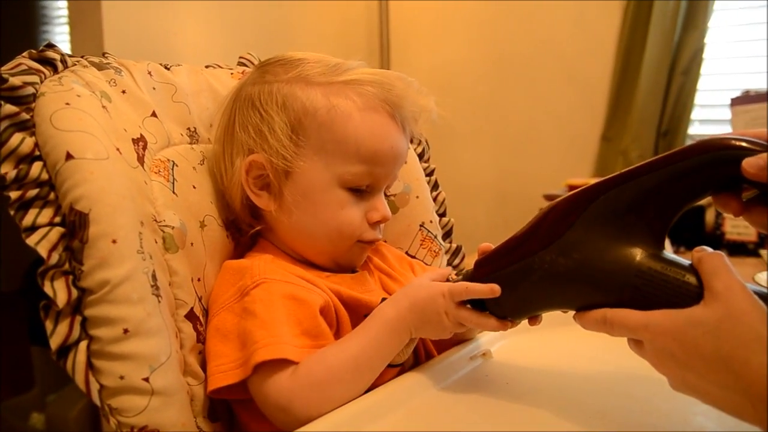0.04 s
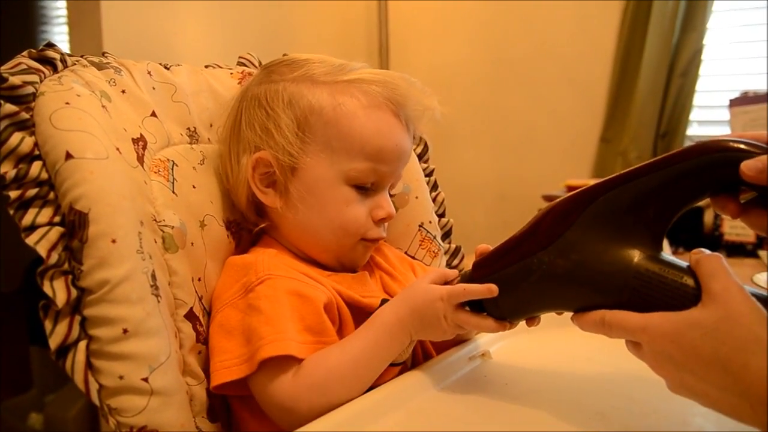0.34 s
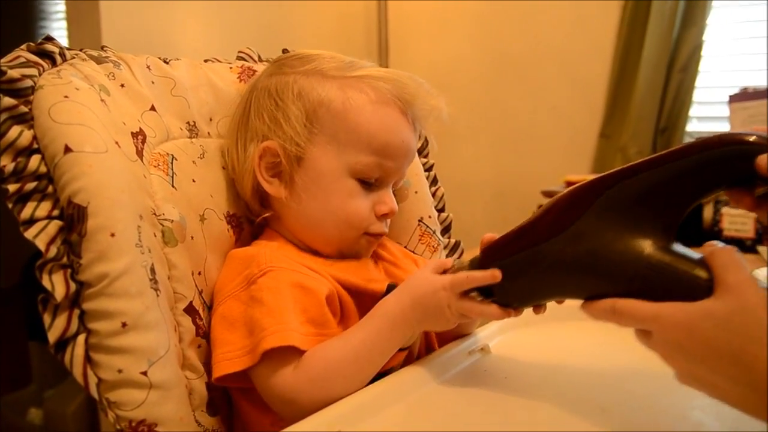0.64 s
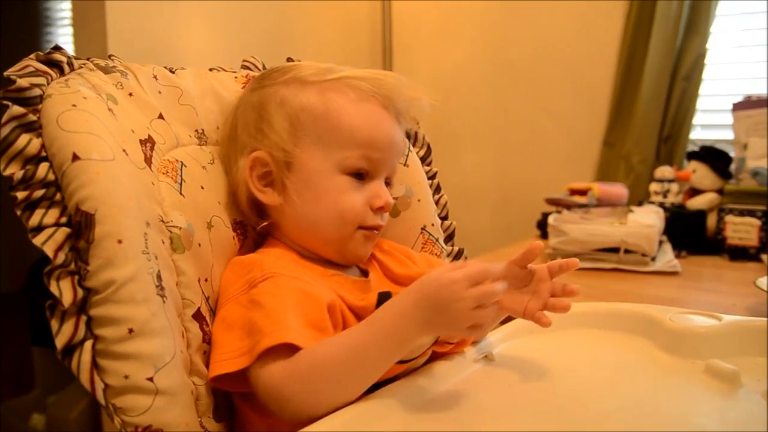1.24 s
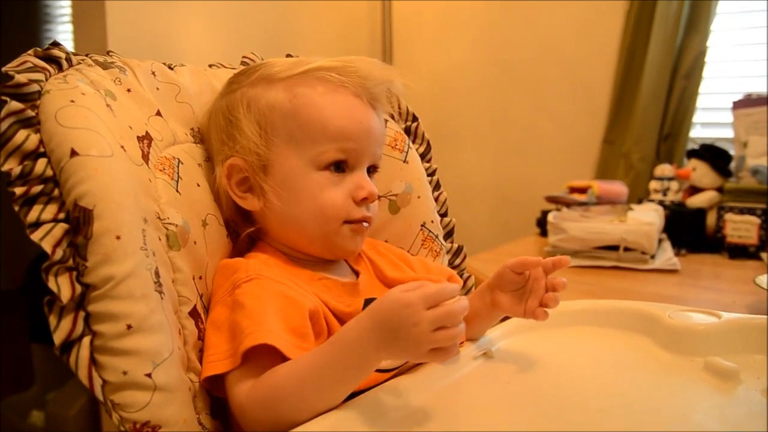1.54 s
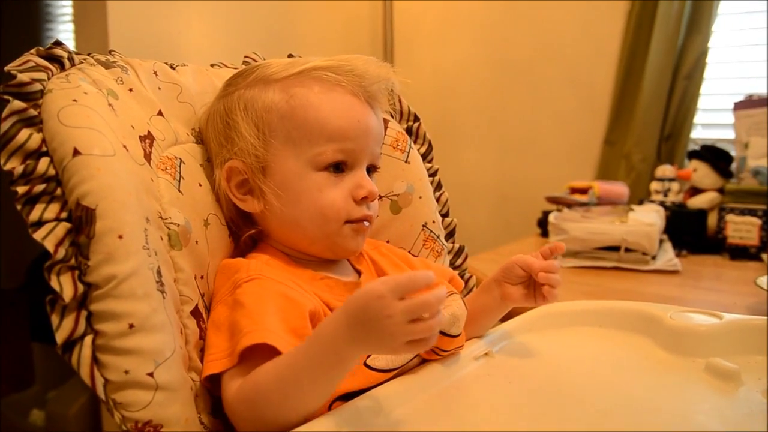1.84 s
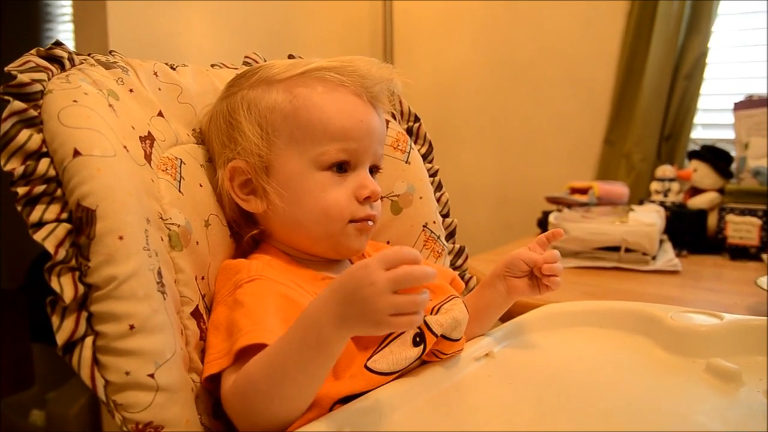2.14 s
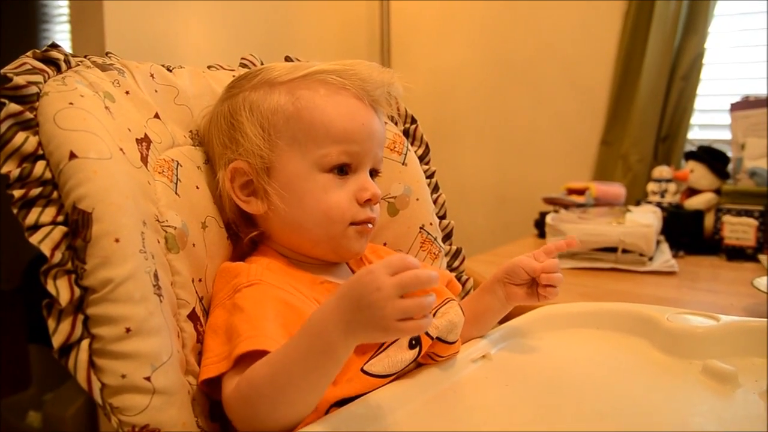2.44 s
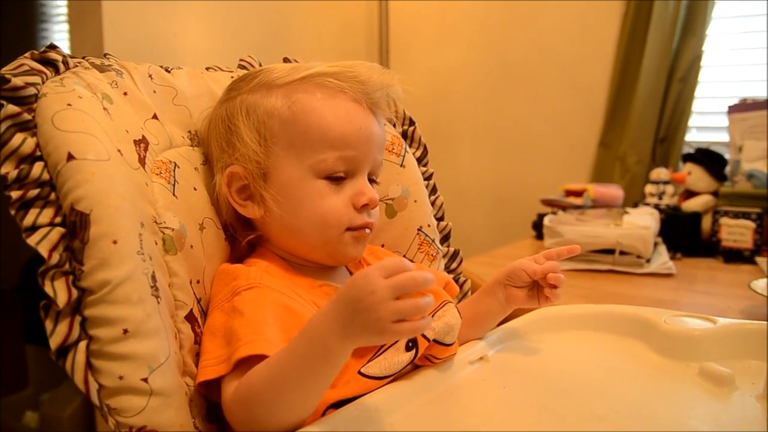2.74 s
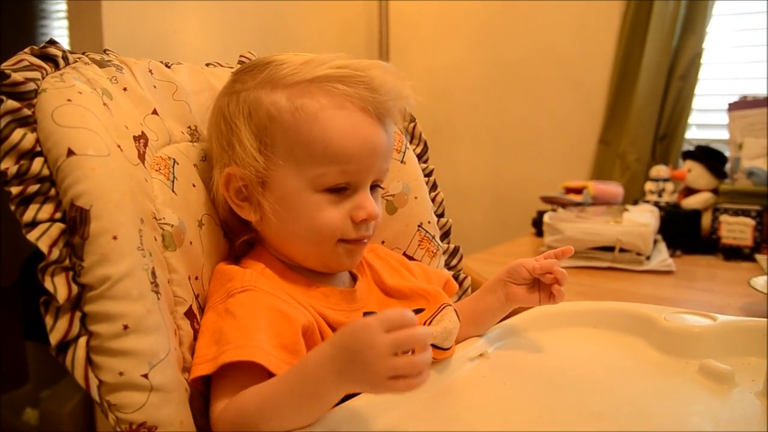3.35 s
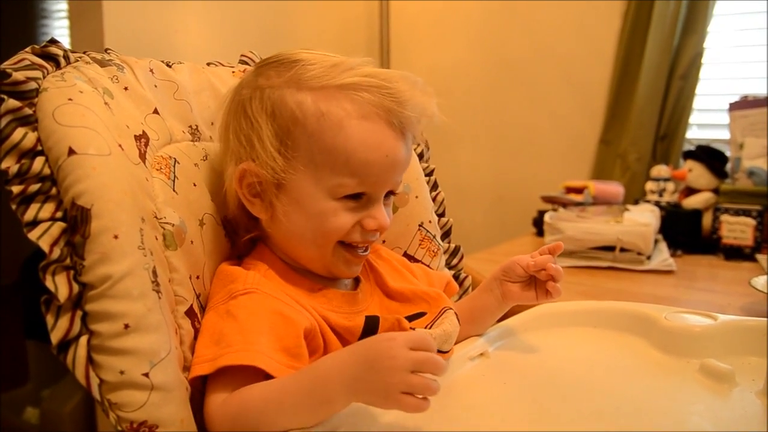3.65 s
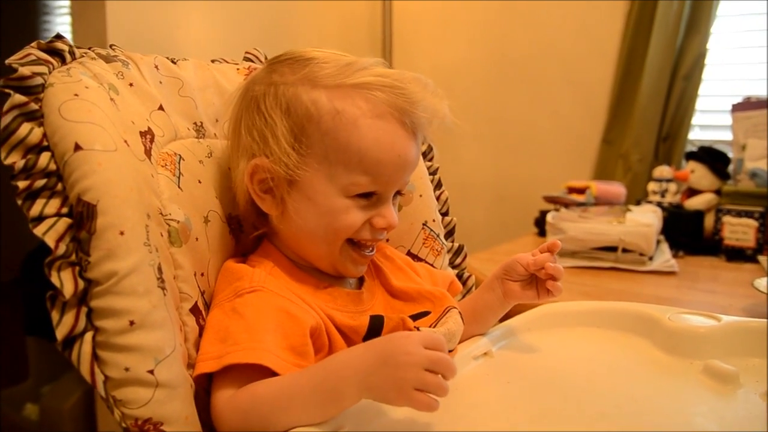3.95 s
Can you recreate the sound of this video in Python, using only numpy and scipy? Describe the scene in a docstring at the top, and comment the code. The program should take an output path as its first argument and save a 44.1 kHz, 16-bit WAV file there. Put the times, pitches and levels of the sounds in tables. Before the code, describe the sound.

Vacuum cleaner running indoors, its covered nozzle pulling free and roaring as it moves away.

```python
"""A vacuum cleaner runs in a room: a steady rush and a motor tone, with the nozzle close by.
At first a small hand half covers the nozzle and air hisses through the gap. At 0.9 s it pulls free:
the mouth resonance falls, the sound opens into a roar and the tone sags a little as air flows freely.
From 2.4 s the nozzle moves away and gets duller. Near 3.1 s it is briefly choked, then roars again."""
import sys
import numpy as np
from scipy import signal
from scipy.fft import rfft, irfft, next_fast_len
from scipy.io import wavfile
from scipy.ndimage import map_coordinates

SR = 44100
rng = np.random.default_rng(int(sys.argv[2]) if len(sys.argv) > 2 else 0)


def pcm_store(signal):
    """Save signal as 16-bit PCM."""
    levels = np.round(np.clip(np.atleast_2d(signal), -1, 1) * 32767)
    wavfile.write(sys.argv[1], SR, levels.astype(np.int16).T)


N = 176400
T = np.arange(N) / SR

# Stereo likeness of air noise, nozzle away and close. Each row: frequency in Hz, left-right correlation.
LIKENESS_AWAY = [(100, .97), (500, 0.93), (1200, 0.7), (2400, 0.57), (4000, 0.63), (7500, 0.74),
                 (10200, 0.19), (12500, 1)]
LIKENESS_CLOSE = [(100, 0.93), (1200, 1), (2200, 1), (5000, 0.97), (8000, 1), (10200, 0.33), (12500, 0.94)]


def amp(db):
    return 10 ** (np.asarray(db) / 20)


def pan(left_lead_db):
    """Left and right gains for a level difference."""
    return amp(np.array([[.5], [-.5]]) * left_lead_db)


def along(points, hz):
    """Rows of (Hz, value), interpolated on a log frequency axis."""
    point_hz, values = np.transpose(points)
    return np.interp(np.log(hz + 1), np.log(point_hz + 1), values)


def curves(rows, t=T):
    """Each column after the time, read at times t."""
    times_s, *columns = np.transpose(rows)
    return [np.interp(t, times_s, column) for column in columns]


def wobble(rate_hz):
    """Smooth random curve, rate_hz knots a second."""
    return map_coordinates(rng.standard_normal(int(N * rate_hz / SR) + 4), [T * rate_hz])


def filtered(x, response):
    """x filtered by the gain response(hz)."""
    size = next_fast_len(N + SR // 2)
    return irfft(rfft(x, size) * response(np.fft.rfftfreq(size, 1 / SR)), size)[..., :N]


def resonance(hz, centre_hz, width_hz):
    """Peak of unit mean power; width taken 6 dB down."""
    gain = 1 / (1 + ((hz - centre_hz) / (width_hz / 2)) ** 2)
    return gain / np.sqrt(np.mean(gain ** 2, axis=0))


def bells(bands, hz):
    """Gain of a set of bell-shaped lifts and dips."""
    return amp(sum(db / (1 + ((hz - centre_hz) / half_hz) ** 2) for centre_hz, half_hz, db in bands))


def turbulence(likeness):
    """White stereo noise with the given left-right correlation."""
    def mid_side_gains(hz):
        angle = np.arccos(np.clip(along(likeness, hz), -.99, .99)) / 2
        return np.array([np.cos(angle), np.sin(angle)])
    mid, side = filtered(rng.standard_normal((2, N)), mid_side_gains)
    return np.array([mid + side, mid - side])


def rush(spectrum, likeness, gain_db, flutter_db):
    """Coloured air noise whose level flutters."""
    air = filtered(turbulence(likeness), lambda hz: amp(along(spectrum, hz))) * np.sqrt(SR / 2)
    return air * amp(gain_db + flutter_db * wobble(rate_hz=45))


def room(x, t60_s=0.21, gain_db=-10.5):
    """Short diffuse reflections from the walls."""
    t = T[:SR // 3]
    tail = rng.standard_normal((2, len(t))) * amp(-60 * t / t60_s) * (t > .004)
    return amp(gain_db) * signal.fftconvolve(x, tail / np.linalg.norm(tail[0]), axes=1)[:, :N]


def duct(x):
    """Standing waves in the air path lift and dip narrow bands."""
    # Each row: centre in Hz, half width in Hz, gain in dB.
    standing_waves = [(175, 12, 3), (240, 10, 4), (280, 12, 3), (352, 15, 4), (432, 10, 4), (457, 9, 5),
                      (486, 16, -7), (618, 15, 3), (815, 35, -3), (967, 14, 4), (1044, 11, 6),
                      (1116, 12, 4), (1320, 12, 4), (1440, 25, -2), (1620, 18, 4), (1742, 12, 4),
                      (1824, 9, 4), (2005, 9, 3), (2195, 12, 4), (2500, 70, -2), (2560, 10, 5),
                      (3765, 12, 4), (4652, 14, 5)]
    return filtered(x, lambda hz: bells(standing_waves, hz))


def machine():
    """Steady rush of the cleaner's body."""
    # Each row: frequency in Hz, noise density in dB.
    spectrum = [(20, -98), (60, -112), (85, -100), (130, -86.5), (180, -74.5), (260, -65.5), (440, -58.5),
                (560, -59), (720, -65.5), (1000, -64), (1500, -67.5), (3000, -73.5), (5000, -75),
                (9000, -95.5), (15000, -103)]
    return rush(spectrum, LIKENESS_AWAY, gain_db=0, flutter_db=0.43)


def motor(drift_hz=0.14, waver_db=.5):
    """Slightly unsteady tone of the motor shaft."""
    # Each row: time in seconds, pitch in Hz.
    speed = [(0, 518.5), (.9, 518.6), (1.05, 517), (1.3, 514.5), (1.6, 511.8), (2.2, 510.7), (3.1, 510.8),
             (3.25, 517.2), (3.45, 513.5), (3.75, 512), (4, 511)]
    # Each row: time in seconds, level in dB.
    levels = [(0, -29.5), (.8, -30), (1.05, -28.5), (1.3, -24), (1.55, -24), (1.75, -22), (2.1, -22.5),
              (2.6, -22), (3.1, -22), (3.3, -28.5), (3.55, -24.5), (3.8, -22), (4, -23)]
    pitch_hz = curves(speed)[0] + drift_hz * wobble(rate_hz=16)
    tone = np.sqrt(2) * np.sin(2 * np.pi * np.cumsum(pitch_hz) / SR)
    return tone * amp(curves(levels)[0] + waver_db * wobble(rate_hz=12))


def puff(peak_s=1.02, half_length_s=0.028, level_db=-46):
    """Soft low thud of draught as the nozzle swings past the microphone."""
    air = filtered(rng.standard_normal(N), lambda hz: resonance(hz, centre_hz=50, width_hz=50))
    air /= np.sqrt(np.mean(air ** 2))
    return air * amp(level_db) * np.exp(-((T - peak_s) / half_length_s) ** 2)


def whistle(centre_hz=6183, width_hz=190, flutter_db=2.5):
    """Breathy narrow band of noise singing at the rim."""
    # Each row: time in seconds, level in dB.
    levels = [(0, -48), (.8, -51), (1, -37.5), (1.28, -45), (1.38, -33.5), (1.7, -38.5), (2.2, -39),
              (2.44, -39), (2.55, -52), (2.8, -49), (4, -52)]
    air = filtered(turbulence(LIKENESS_AWAY), lambda hz: resonance(hz, centre_hz, width_hz))
    return air * amp(curves(levels)[0] + flutter_db * wobble(rate_hz=24.85))


def gulps():
    """Air squeezing in as the nozzle closes or bursts open briefly rings the gap."""
    # Each row: peak time and half length in seconds, centre and width in Hz, level in dB.
    bursts = [(0.773, 0.076, 2530, 160, -27), (0.848, .04, 7300, 350, -38), (0.91, .025, 4740, 380, -27),
              (.905, 0.034, 7860, 350, -32), (.912, 0.0075, 2570, 300, -22), (.94, 0.026, 785, 190, -20),
              (0.942, 0.019, 580, 90, -18.5), (3.053, 0.015, 2890, 900, -26), (3.13, .07, 2900, 280, -35.5),
              (3.13, .07, 7450, 200, -41), (3.195, .02, 2900, 500, -25), (3.203, 0.02, 1580, 260, -23.5),
              (3.225, 0.037, 2450, 463, -26)]
    hz, t, noise = signal.stft(turbulence(LIKENESS_CLOSE), SR, nperseg=512)
    power = 0
    for peak_s, half_length_s, centre_hz, width_hz, level_db in bursts:
        envelope = amp(level_db) * np.exp(-((t - peak_s) / half_length_s) ** 2)
        power += (resonance(hz, centre_hz, width_hz)[:, None] * envelope) ** 2
    return signal.istft(noise * np.sqrt(power), SR)[1][:, :N]


def mouth(flutter_db=0.56):
    """Turbulence rings the nozzle's mouth; the resonance falls as it opens."""
    # Each row: time in seconds, centre in Hz, width in Hz, level in dB.
    glide = [(0, 4230, 1400, -24.5), (.5, 4360, 1400, -27), (.66, 3630, 1000, -20.5),
             (.77, 3550, 1000, -22.5), (.83, 2900, 1100, -27), (.895, 2600, 700, -23.5),
             (.908, 2540, 300, -11), (.94, 2500, 450, -22), (.965, 1840, 330, -15.5),
             (1.03, 1750, 190, -15.5), (1.12, 1720, 190, -19), (1.17, 2100, 480, -23.5),
             (1.5, 2140, 327, -20.5), (2.29, 2095, 400, -21.5), (2.39, 1730, 230, -25),
             (2.48, 1650, 200, -34), (2.62, 1640, 170, -30), (3, 1650, 150, -29.5), (3.13, 1570, 297, -53),
             (3.175, 1590, 400, -39), (3.21, 1530, 250, -20), (3.26, 1580, 250, -39), (3.6, 1620, 160, -31),
             (4, 1500, 150, -32.5)]
    hz, t, noise = signal.stft(turbulence(LIKENESS_CLOSE), SR, nperseg=512)
    centre_hz, width_hz, _ = curves(glide, t)
    air = signal.istft(noise * resonance(hz[:, None], centre_hz, width_hz), SR)[1][:, :N]
    return air * amp(curves(glide)[2] + flutter_db * wobble(rate_hz=68))


def rim_hiss():
    """Air hissing over the rim."""
    # Each row: frequency in Hz, noise density in dB.
    spectrum = [(1000, -102), (3000, -66.5), (5000, -69.5), (6400, -67), (7600, -70), (8600, -72.5),
                (10000, -78), (12000, -81), (15000, -103)]
    # Each row: time in seconds, gain in dB.
    gains = [(0, 0), (.6, 1), (.73, -6.5), (.82, 2), (.91, 8), (.97, -4), (1.1, -5.5), (1.5, -5),
             (2.25, -5), (2.42, -0.5), (2.55, -6.5), (2.95, -19), (3.03, -9), (3.09, -2.5), (3.16, 0),
             (3.2, 4), (3.27, -11.5), (3.7, -12), (3.8, -11), (4, -13)]
    return rush(spectrum, LIKENESS_AWAY, curves(gains)[0], flutter_db=0.74)


def covered_nozzle():
    """Air drawn past the hand, whose shadow shifts the stereo balance."""
    # Each row: frequency in Hz, noise density in dB.
    spectrum = [(150, -100), (350, -71), (680, -58.5), (850, -50.5), (1100, -51.5), (1350, -51.5),
                (1680, -63.5), (2000, -59), (2500, -67), (3400, -57.5), (5300, -60.5), (5900, -67),
                (6450, -64.5), (7100, -75), (7750, -69), (8300, -76), (9200, -71.5), (10500, -78),
                (15000, -91)]
    # Each row: time in seconds, gain in dB.
    gains = [(0, 0.5), (.3, 1.5), (.65, 0), (.78, -3), (.87, -1.5), (.95, -19), (1.05, -50)]
    # Each row: frequency in Hz, left minus right in dB.
    hand_shadow = [(1200, -0.5), (1900, 4.5), (3000, 2), (7000, -2), (9500, 0), (11200, 8), (13000, 1)]
    air = rush(spectrum, LIKENESS_CLOSE, curves(gains)[0], flutter_db=-1.04)
    return filtered(air, lambda hz: pan(along(hand_shadow, hz)))


def open_nozzle():
    """Air roaring into the open mouth, plus an upper rush while it is near."""
    # Each row: frequency in Hz, noise density in dB.
    roar_spectrum = [(150, -89), (350, -70), (600, -56.5), (830, -57), (1100, -58.5), (1400, -56.5),
                     (2200, -58), (2600, -62), (3400, -74), (5000, -79), (8000, -84), (15000, -102)]
    near_spectrum = [(600, -114), (1400, -66), (2300, -52), (2550, -78.5), (2850, -58.5), (3400, -63.5),
                     (4150, -61), (4800, -70), (7000, -78), (7900, -72), (9500, -110)]
    # Each row: time in seconds, gain in dB.
    roar_gains = [(0, -15), (.89, -8), (.91, 6), (.945, 4.5), (1, 6.5), (1.25, 4), (1.8, 3.5), (2.4, 3),
                  (2.6, 0), (3, 0.5), (3.06, -1), (3.1, -9), (3.17, -7.5), (3.22, 2), (3.3, 0), (3.7, 0.5),
                  (4, -1)]
    near_gains = [(.85, -30), (.91, 2.5), (1, 0), (1.5, -1.5), (2.2, -1.5), (2.4, 0.5), (2.6, -9.5),
                  (2.9, -18), (3.15, -19), (3.21, -5), (3.3, -11), (4, -24)]
    roar = rush(roar_spectrum, LIKENESS_AWAY, curves(roar_gains)[0], flutter_db=0.62)
    near = rush(near_spectrum, LIKENESS_AWAY, curves(near_gains)[0], flutter_db=1.14)
    return roar + near


def scene():
    """The moving nozzle's air in the room, over the machine's rush and tone."""
    # Nozzle position. Each row: time in seconds, left minus right in dB.
    swing = [(0, 0.4), (.9, 0), (1.2, -0.5), (2.2, -0.8), (2.6, -2), (3.2, -3), (4, -1)]
    air = covered_nozzle() + open_nozzle() + rim_hiss() + mouth() + whistle() + gulps()
    air *= pan(curves(swing)[0])
    return duct(machine() + air + room(air)) + motor() + puff()


def record(dry, top_hz=14900):
    """The microphone housing cuts two notches and favours the left; the band ends at top_hz."""
    # Each row: centre in Hz, half width in Hz, gain in dB.
    notches = [(5715, 125, -14), (6890, 50, -10)]
    # Each row: frequency in Hz, left minus right in dB.
    left_lead = [(100, -2), (450, 3), (900, 1.2), (1800, 0.5), (2800, 0.2), (6000, 1.5), (9300, 2.5),
                 (10700, 5.5), (13000, 0.5)]
    coloured = filtered(dry, lambda hz: bells(notches, hz) * pan(along(left_lead, hz)))
    return filtered(coloured, lambda hz: hz < top_hz)


dry = scene()
out = record(dry)
pcm_store(out)
```